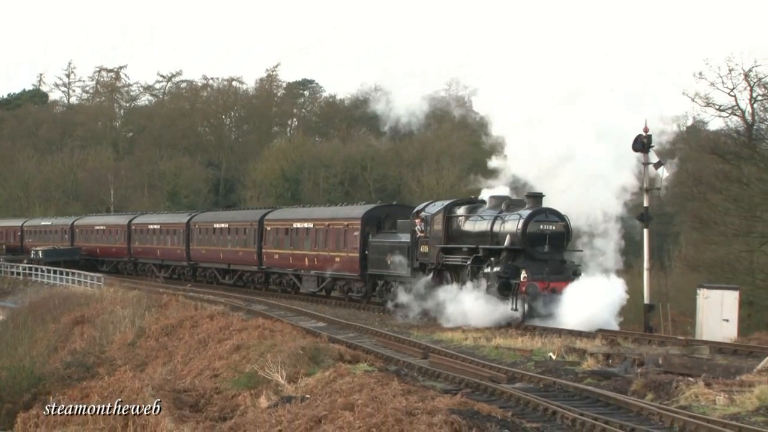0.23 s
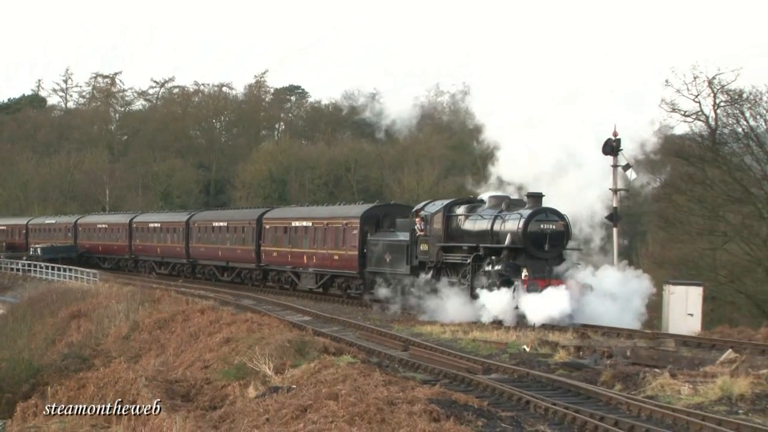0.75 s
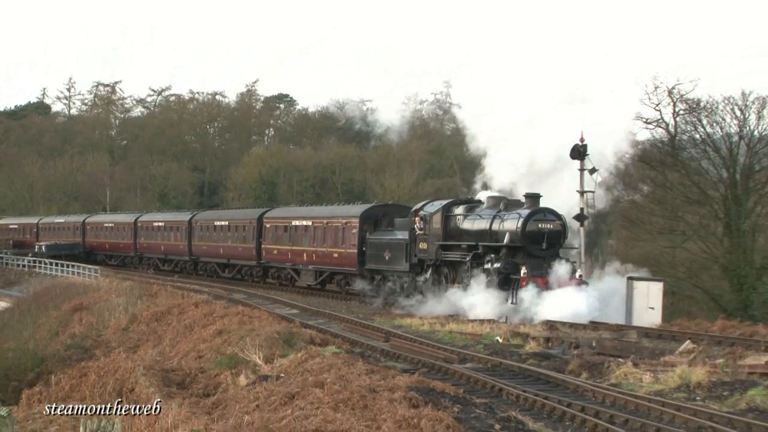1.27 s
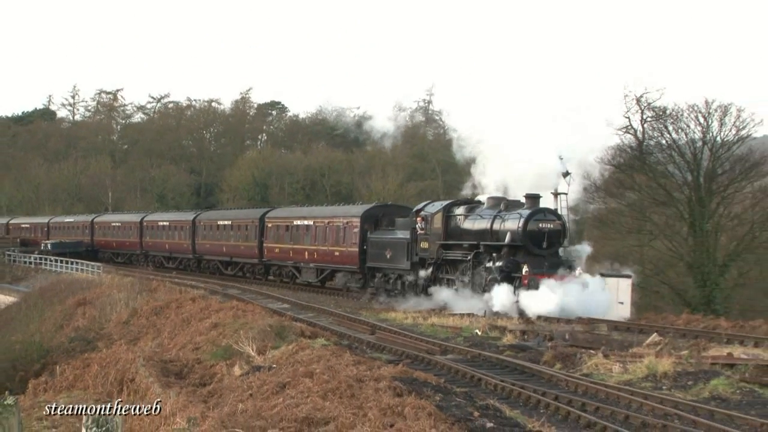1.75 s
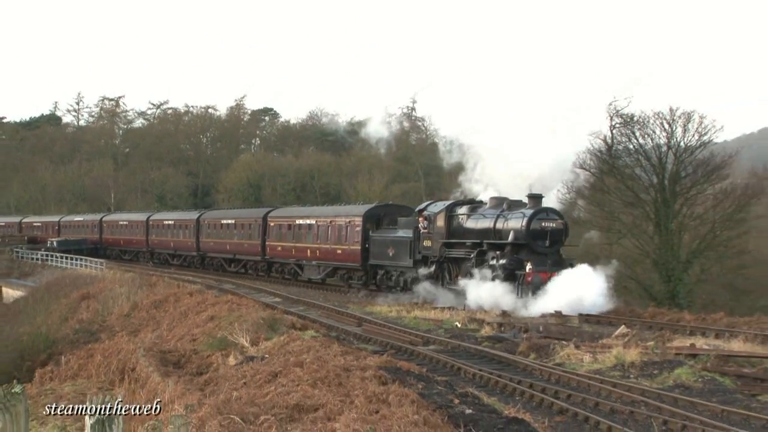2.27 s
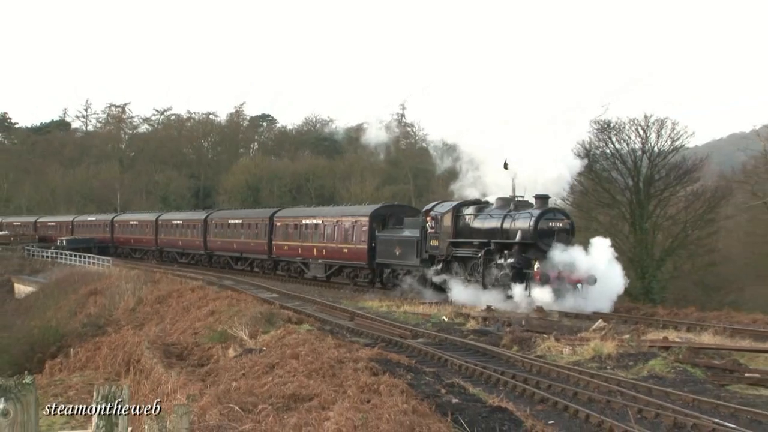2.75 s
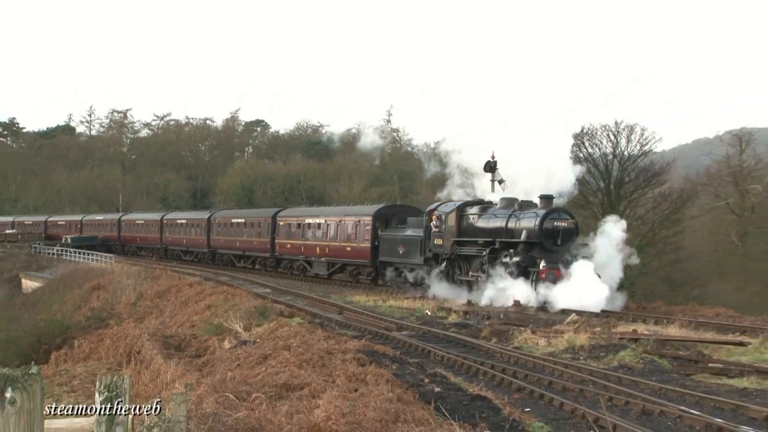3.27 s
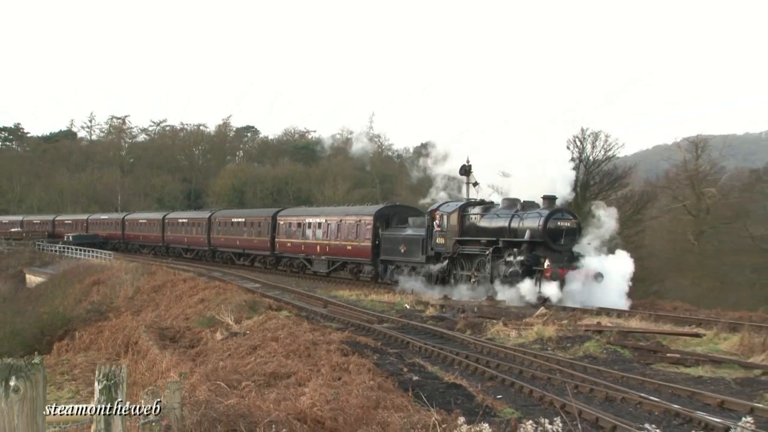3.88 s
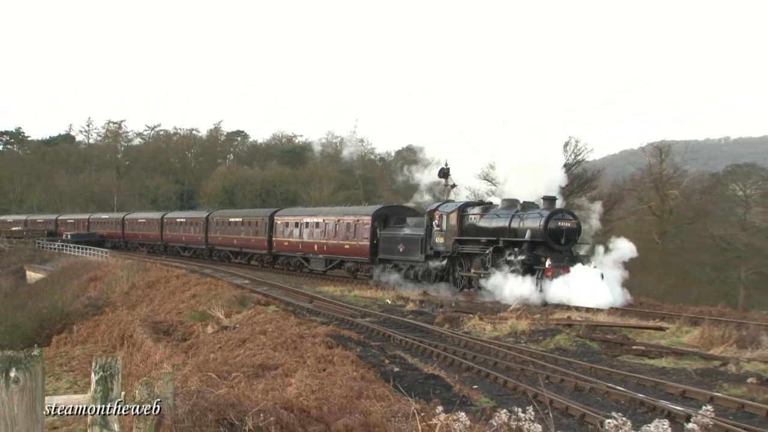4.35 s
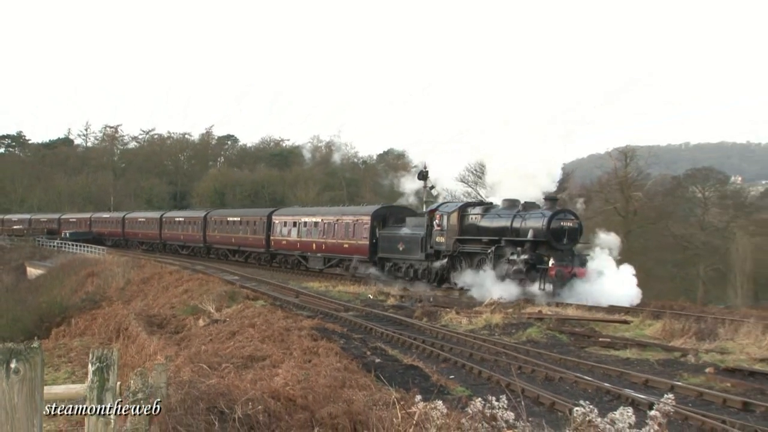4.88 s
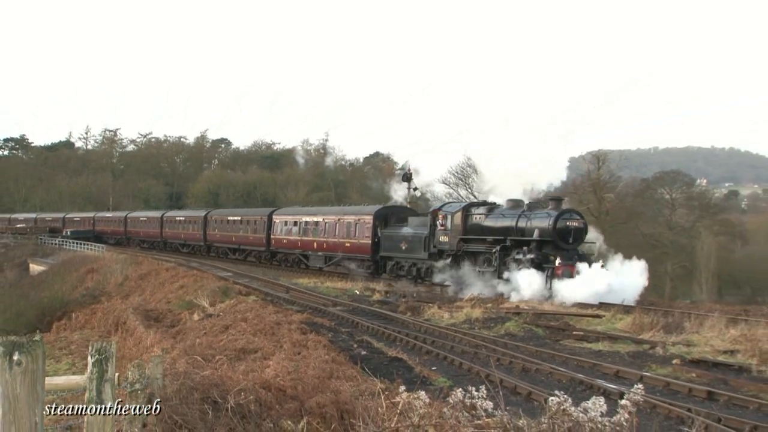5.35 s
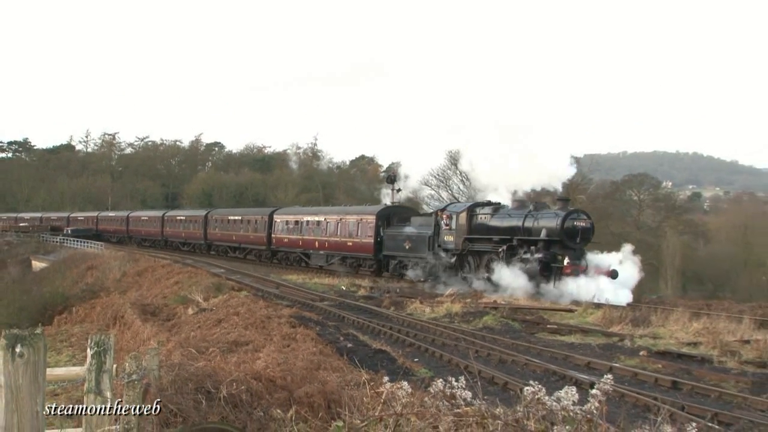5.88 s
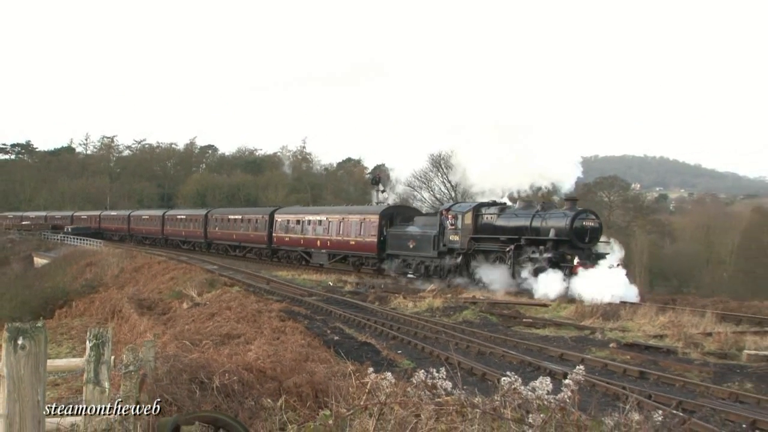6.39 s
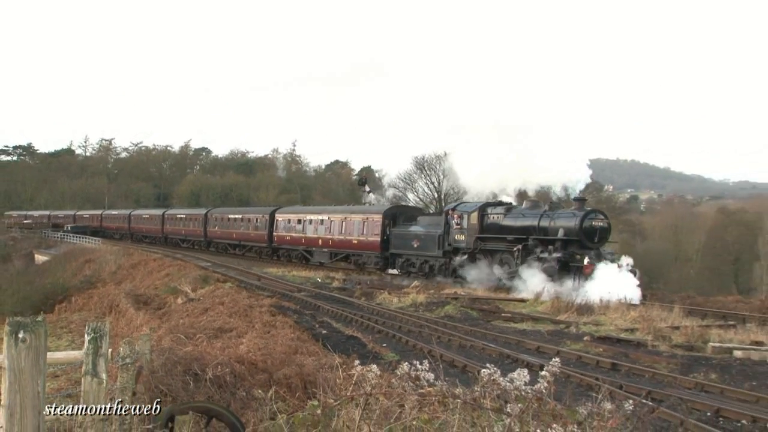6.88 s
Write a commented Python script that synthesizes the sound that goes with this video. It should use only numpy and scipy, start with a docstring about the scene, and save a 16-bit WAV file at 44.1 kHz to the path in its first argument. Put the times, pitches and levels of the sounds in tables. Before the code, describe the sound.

A steam locomotive with coaches approaches along a curve in open country, heard from the lineside, centred and at some distance. From 0 to 7 seconds it chuffs without pause, four uneven low barks per wheel turn, about 3.6 each second and very slowly quickening, each a ragged gust with a hollow chimney ring. Drain steam is already blowing at the start, then new jets burst at about 0.65, 1.8, 2.9, 4.0, 5.05 and 6.1 seconds. Each swells in a tenth of a second, roars and hisses for about half a second, sags and cuts off, leaving chuffs exposed. The jets vary in colour; the last is the sharpest and fizziest. A tiny steel chink sounds near 1.6. Underneath are soft uneven coach rumble, a thin leak and a faint fuzzy whine, slightly clearer near 5.8. Trees return a dull, diffuse tail.

```python
"""By a curved line a two-cylinder steam locomotive draws a passenger train towards the listener.
Four chuffs a turn run throughout, gusts of noise with a ringing chimney note, scattered dully by the
woods; once a turn an open drain cock blows a long jet of shaped noise along the ground.
Under them coaches roll as uneven noise, with a thin leak and its whistle.
Steel chinks once as a short high sine, while the turns slowly quicken."""
import sys
import numpy as np
from scipy import signal
from scipy.fft import rfft, irfft
from scipy.io import wavfile

SR = 44100
rng = np.random.default_rng(int(sys.argv[2]) if len(sys.argv) > 2 else 0)


def materialize(psi):
    """Save the field psi as 16-bit PCM at rate SR to the path in sys.argv[1].

    A 1-D psi becomes a single channel; in a 2-D psi each row is a channel.
    """
    bounded = np.clip(np.atleast_2d(psi).T, -1, 1)
    quanta = np.round(bounded * 32767).astype(np.int16)
    wavfile.write(sys.argv[1], SR, quanta)


N = 314433

FRAME, HOP = 512, 128  # short-time spectrum (samples)
HZ = np.fft.rfftfreq(FRAME, 1 / SR)
FRAME_S = np.arange(N // HOP + 3) * HOP / SR

# One row for each turn of the driving wheels, with its blast from the drain cock:
# start_s, roar_db, hiss_db, fizz_db (before the swell and sag), build_s (before the factor for each pitch),
# mid-stroke swell_db and brightening_db over the stroke (before their shares for each pitch),
# howl_hz, howl_width_hz, howl_db, whistle_hz, whistle_db, chuffs_over_usual_db, boom_over_usual_db
TURNS = [(-0.468, -20.5, -19.5, -33.5, 0.12, 0, 0, 2040, 300, 6, 5600, 3.5, 1.5, -2),
         (0.659, -20, -18, -36.5, 0.1, 1.5, -1, 2530, 330, 4.5, 5600, 2, 0.5, -6.5),
         (1.775, -16.5, -18, -33.5, 0.11, -1.5, -1.5, 2700, 1200, 5.5, 5200, 3.5, 0.5, -1),
         (2.878, -16.5, -21.5, -37, 0.11, 0, 0.5, 2600, 510, 2, 5700, 0, 0.5, 0),
         (3.972, -18, -18, -33.5, 0.095, 3, 2.5, 2290, 220, 4.5, 4600, 3.5, -1, 3),
         (5.058, -18, -18, -32, 0.11, 0, 5.5, 2350, 200, 2.5, 5400, 1.5, 1, 3),
         (6.126, -17.5, -14.5, -23, 0.1, -4.5, -2, 1940, 260, 2.5, 5070, 3.5, 1, 5)]


def gain_of(db):
    """Decibels to amplitude."""
    return 10 ** (np.asarray(db) / 20)


def evened(x):
    """Scales to rms 1."""
    return x / np.sqrt(np.mean(x ** 2) + 1e-20)


def read(points, hz):
    """Reads a spectrum along a log-frequency axis."""
    f, value = np.transpose(points)
    return np.interp(np.log(hz + 1), np.log(f + 1), value)


def level_in(spectrum_db, band):
    """Level in dB of the part of a spectrum that lies in a band."""
    inside = (HZ > band[0]) * (HZ < band[1])
    return 10 * np.log10(np.mean(gain_of(spectrum_db) ** 2 * inside))


def add(mix, s, sound):
    """Mixes a sound in at time s."""
    part = mix[max(round(s * SR), 0):][:len(sound)]
    part += sound[:len(part)]


def noise(magnitude):
    """Noise whose short-time spectrum follows a frames x bins magnitude."""
    white = rng.standard_normal(N + 2 * FRAME)
    z = signal.stft(white, nperseg=FRAME, noverlap=FRAME - HOP)[2]
    shaped = z[:, :len(magnitude)] * magnitude.T
    return signal.istft(shaped, nperseg=FRAME, noverlap=FRAME - HOP)[1][:N]


def eddies(seconds, width_hz):
    """Random patches of rms 1 over time and frequency; the settings scale their duration and width."""
    white = rng.standard_normal((len(FRAME_S), len(HZ)))
    along = np.fft.fftfreq(len(FRAME_S), HOP / SR)[:, None]
    across = np.fft.fftfreq(len(HZ), HZ[1])
    smoothing = np.exp(-(along * seconds) ** 2 - (across * width_hz) ** 2)
    return evened(np.fft.ifft2(np.fft.fft2(white) * smoothing).real)


def bump(hz, width_hz):
    """A bell of height 1 on the frequency axis, width_hz wide at half height."""
    return 1 / (1 + (2 * (HZ - hz) / width_hz) ** 2)


def turn_length(s):
    """Seconds taken by the wheel turn that starts at time s, as the speed grows by a steady amount."""
    turn_s, quickening = 1.12, 0.0084  # length at time 0 (s); share of speed gained each second
    return turn_s / (1 + quickening * s)


def blast(s, build_s, swell_db, brighten_db):
    """Frames x bins gain: the valve cracks open, the jet surges, sags with the pressure and is cut off."""
    # life of a blast from roar to fizz; each table has pitch_hz and then:
    build = [(2000, 1.19), (5000, 1.3), (11000, 1.25)]  # factor on the time to build
    sag = [(2000, 6.47), (5000, 6.55), (11000, 3.2)]  # loss_db by the end of the stroke, as the cylinder's pressure drops
    shut = [(2000, 0.47), (5000, 0.5), (11000, 0.49)]  # share of the turn at which the steam is cut off
    dying = [(2000, 240), (5000, 520), (11000, 470)]  # fall_db_per_s once the steam is cut off
    swell = [(2000, 0.047), (5000, 1.0), (11000, 0.74)]  # share of the mid-stroke swell
    cracked = [(2000, 0.1), (5000, 0.22), (11000, 0.13)]  # share of the full jet that passes the cracked valve
    brightening = [(2000, 0), (5000, 0.44), (11000, 1)]  # share of the brightening over the stroke
    lead_s, crack_s = 0.043, 0.061  # steam enters before the first beat; time to crack the valve open
    crack_power, surge_power, sag_power = 2.25, 3.36, 2.53  # bends of the three curves

    t = FRAME_S[:, None] - s
    shut_s = read(shut, HZ) * turn_length(s)
    crack = np.clip((t + lead_s) / crack_s, 0, 1) ** crack_power
    surge = np.clip((t + lead_s) / (build_s * read(build, HZ)), 0, 1) ** surge_power
    share = read(cracked, HZ)
    opening = share * crack + (1 - share) * surge
    stroke = np.clip(t / shut_s, 0, 1)
    swell_now_db = swell_db * read(swell, HZ) * np.sin(np.pi * stroke) ** 2
    pressure_db = swell_now_db - read(sag, HZ) * stroke ** sag_power
    treble_db = brighten_db * read(brightening, HZ) * stroke
    dying_db = read(dying, HZ) * np.clip(t - shut_s, 0, 1)
    return opening * gain_of(pressure_db + treble_db - dying_db)


def drain_cock(notch_db=-9, notch_width_hz=190, crest_db=4, whistle_width_hz=700,
               patchy_db=1.0, drift_db=1.17):
    """A turbulent jet for about half of each turn; the ground's reflection cuts a notch that sinks."""
    # colour of the jet: pitch_hz, relative_level_db (per Hz)
    jet_colour = [(150, -37), (400, -21.5), (700, -16), (1000, -6.5), (1400, -1.5), (2300, -3),
                  (3500, -4.5), (5700, -2), (7500, -4), (10000, -10), (13000, -16), (15500, -26)]
    bands = (1200, 3200), (3500, 7000), (9000, 14000)  # roar, hiss, fizz (Hz)
    far_hz, near_hz, nearing_s = 1850, 1588, 2  # ground notch at time 0, close by, and time constant
    jet = read(jet_colour, HZ)
    field = np.zeros((len(FRAME_S), len(HZ)))
    # each band's level holds around its own centre and blends into its neighbours'
    shares = np.array([read(list(zip([2400, 4800, 11800], row)), HZ) for row in np.eye(len(bands))])
    for (s, roar_db, hiss_db, fizz_db, build_s, swell_db, brighten_db,
         howl_hz, howl_width, howl_db, whistle_hz, whistle_db, *_) in TURNS:
        notch_hz = near_hz + (far_hz - near_hz) * np.exp(-s / nearing_s)
        body_db = 0.6 - 1.0 * s  # the low body thins as the engine turns side-on
        ground = notch_db * bump(notch_hz, notch_width_hz) + crest_db * bump(notch_hz * 0.945, 220)
        howl = howl_db * bump(howl_hz, howl_width)
        whistle = whistle_db * bump(whistle_hz, whistle_width_hz)
        colour = jet + ground + body_db * bump(1330, 570) + howl + whistle
        wanted = zip((roar_db, hiss_db, fizz_db), bands)
        levels = np.array([db - level_in(colour, band) for db, band in wanted])
        field += blast(s, build_s, swell_db, brighten_db) * gain_of(colour + levels @ shares)
    flutter_weight = 0.69 * read([(600, 0.66), (3000, 0.6), (10000, 2.4)], HZ)
    flutter = flutter_weight * eddies(0.032, 8200)
    patches = patchy_db * eddies(0.046, 630)
    # the jet's fine colour drifts slowly at random
    drift = drift_db * eddies(0.99, 240)
    return noise(field * gain_of(flutter + patches + drift))


def lineside(x, scatter_db=-15, t60=0.19):
    """Ballast, rails and the engine's flank add early reflections that roughen the spectrum."""
    t = np.arange(SR // 10) / SR
    taps = rng.standard_normal(len(t)) * gain_of(-60 * t / t60) * (t > .002)
    return gain_of(scatter_db) * signal.fftconvolve(x, taps / np.linalg.norm(taps))[:N]


def train(rolling_db=-46):
    """Wheels rumble unevenly under the coaches, with a thin leak of steam on top."""
    # long-term colour of the rolling noise: pitch_hz, relative_level_db (per Hz)
    rolling = [(12, -33), (20, -6.5), (82, -8), (286, -18.5), (1270, -16), (1390, -18), (1510, -17.5),
               (1990, -16.5), (2770, -18.5), (3360, -19.5), (3860, -22.5), (5690, -23.5), (10500, -36),
               (15000, -50)]
    # thin hiss under the train: time_s, relative_level_db (before the weight for each pitch)
    leak = [(0, -2), (1.5, -2.5), (2.6, -4), (3.7, -2), (4.8, -6), (5.8, -3.5), (7.1, -4)]
    # a resonance and a slight dip in the rolling noise: pitch_hz, width_hz, change_db
    tints = [(828, 40, 14), (10470, 150, -1)]
    hz = np.fft.rfftfreq(N, 1 / SR)
    leak_weight = read([(500, 0.16), (2500, 1.0)], HZ)
    leak_db = np.interp(FRAME_S, *np.transpose(leak))[:, None] * leak_weight
    jolts_db = eddies(0.07, 590) * read([(200, 3.9), (1000, 2.9), (4000, 1.3)], HZ)
    tint_db = sum(db * bump(f, width) for f, width, db in tints)
    drift_db = 1.4 * eddies(1.5, 170)
    rough = noise(gain_of(leak_db + jolts_db + tint_db + drift_db))
    coloured = irfft(rfft(rough) * gain_of(read(rolling, hz)), N)
    return gain_of(rolling_db) * evened(coloured)


def whine(hz=3440, half_width_hz=35):
    """Steam through a narrow gap sings one fuzzy note, a narrow band of noise."""
    # thin whistle of the leaking steam: time_s, level_db
    whine_level = [(0, -73), (3.3, -71), (3.7, -71), (4.8, -80), (5.8, -64), (6.9, -65)]
    f = np.fft.rfftfreq(N, 1 / SR)
    resonance = 1 / (1 + ((f - hz) / half_width_hz) ** 2)
    note = irfft(rfft(rng.standard_normal(N)) * resonance, N)
    return evened(note) * gain_of(np.interp(np.arange(N) / SR, *np.transpose(whine_level)))


def chuffs():
    """Every exhaust beat, four to a turn: start_s, open_s, level_db, bark_hz, boom_db."""
    # the four uneven beats: share of the turn, valve open_s, usual level_db, bark_hz, usual boom_db
    beat_rows = [(0, 0.056, -22, 407, -34), (0.26, 0.056, -24, 393, -37), (0.497, 0.057, -27, 430, -39.5),
                 (0.741, 0.052, -24.5, 428, -36.5)]
    beats = []
    for s, *_, turn_db, turn_boom_db in TURNS:
        for share, open_s, db, hz, boom_db in beat_rows:
            start_s = s + share * turn_length(s)
            beats.append((start_s, open_s, db + turn_db, hz, boom_db + turn_boom_db))
    return [beat for beat in beats if beat[0] > 0]


def chimney(bark_db=4.5, bark_width_hz=100, ragged_db=0.5, rasp_hz=1100, hollow_hz=700):
    """Each beat is a ragged gust of noise: its low bark rises first, the rush of steam swells within it."""
    # colour of a chuff: pitch_hz, relative_level_db (per Hz)
    chuff_colour = [(24, -42), (40, -14), (76, -1), (135, -49.5), (182, -6), (401, -4), (527, -3.5),
                    (746, -5.5), (1230, -13.5), (1490, -18), (1820, -17), (3740, -27), (5040, -27.5),
                    (9840, -43.5), (15000, -59)]
    # upper bark and hollowing middle as the engine turns side-on: time_s, rasp_db, hollow_db
    turning = [(0, 6, -2.5), (3.7, -2, 1.5), (4.8, -3.5, -8.5), (7, 0.5, -16.5)]
    bark_band = (250, 650)  # Hz, where each beat's level is set
    field = np.zeros((len(FRAME_S), len(HZ)))
    rise_s = 0.022 * read([(400, 1.57), (1500, 1.75), (6000, 2.1)], HZ)
    t60 = read([(100, 0.27), (450, 0.17), (1500, 0.24), (8000, 0.17)], HZ)
    hold = read([(400, 1.0), (2000, 0.84), (8000, 0.86)], HZ)  # share of the valve's open time
    times, rasp_db, hollow_db = np.transpose(turning)
    for s, open_s, db, bark_hz, _ in chuffs():
        near = abs(FRAME_S - s - .15) < .2
        t = FRAME_S[near, None] - s + 0.011  # the gust starts 11 ms ahead of the beat
        colour = read(chuff_colour, HZ) + bark_db * bump(bark_hz, bark_width_hz)
        colour += np.interp(s, times, rasp_db) * bump(rasp_hz, 520)
        colour += np.interp(s, times, hollow_db) * bump(hollow_hz, 107)
        decay_db = -60 * np.maximum(t - open_s * hold, 0) / t60
        gust = np.clip(t / rise_s, 0, 1) * gain_of(decay_db)
        field[near] += gust * gain_of(db + colour - level_in(colour, bark_band))
    return noise(field * gain_of(ragged_db * eddies(0.01, 2800)))


def boom(hz=194, t60=0.22, trim_db=1):
    """Every gust also sets the air of the smokebox and chimney ringing on one low note."""
    out, t = np.zeros(N), np.arange(SR // 3) / SR
    ring = np.sin(2 * np.pi * hz * t) * gain_of(-60 * t / t60)
    for s, open_s, _, _, db in chuffs():
        puff = rng.standard_normal(len(t))
        gust = np.sin(np.pi * np.clip(t / (1.33 * open_s), 0, 1))
        note = signal.fftconvolve(puff * gust, ring)[:len(t)]
        unit_note = note / np.linalg.norm(note)
        add(out, s, gain_of(db + trim_db) * unit_note * np.sqrt(open_s * SR))
    return out


def woods(x, delay_s=0.037, t60=0.6):
    """Trees scatter back a late, dull tail."""
    t, hz = np.arange(SR) / SR, np.fft.rfftfreq(SR, 1 / SR)
    fade_in = np.clip(t / delay_s - 1, 0, 1)
    tail = rng.standard_normal(SR) * fade_in * gain_of(-60 * t / t60)
    colour_db = read([(200, -32.5), (800, -19.5), (2500, -34.5), (8000, -39.5)], hz)
    tail = irfft(rfft(tail / np.linalg.norm(tail)) * gain_of(colour_db), SR)
    return signal.fftconvolve(x, tail)[:N]


def chinks(t60=.04):
    """Steel on steel in the running gear: a tiny high sine that rings down."""
    # strokes of steel: start_s, pitch_hz, level_db (before the decay)
    strokes = [(1.637, 10470, -46)]
    out, t = np.zeros(N), np.arange(SR // 10) / SR
    for s, hz, db in strokes:
        attack = np.minimum(t / .002, 1)
        add(out, s, attack * gain_of(db - 60 * t / t60) * np.sin(2 * np.pi * hz * t))
    return out


def scene():
    """The whole train is far enough off to reach both ears alike."""
    jet = drain_cock()
    engine = jet + lineside(jet) + chimney() + boom()
    mono = engine + woods(engine) + train() + whine() + chinks()
    return np.array([mono, mono])


def record(dry, ceiling=1.0, edge_hz=15720):
    """The highest peaks are rounded off; then the recorder's band limit cuts the top treble."""
    rounded = dry / (1 + (dry / ceiling) ** 8) ** (1 / 8)
    low_pass = signal.firwin(1023, edge_hz, window=("kaiser", 9), fs=SR)
    return signal.oaconvolve(rounded, low_pass[None], "same")


dry = scene()
out = record(dry)
materialize(out)
```